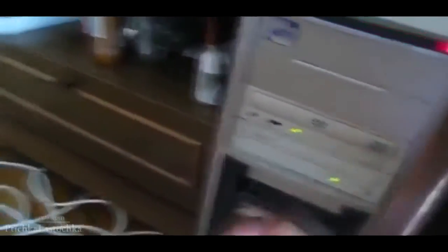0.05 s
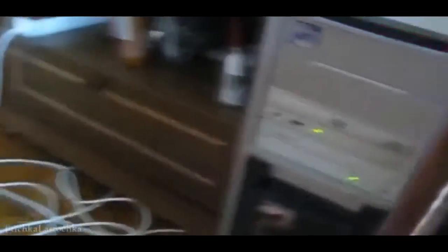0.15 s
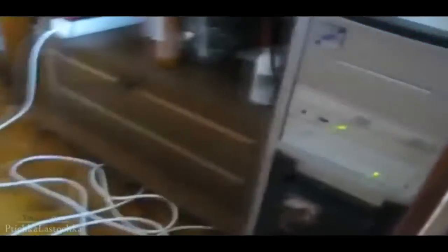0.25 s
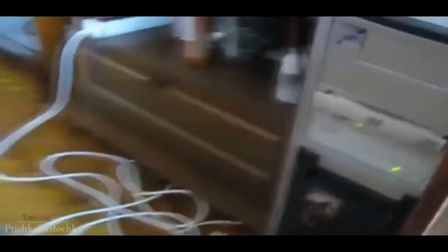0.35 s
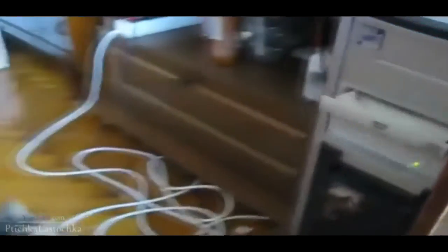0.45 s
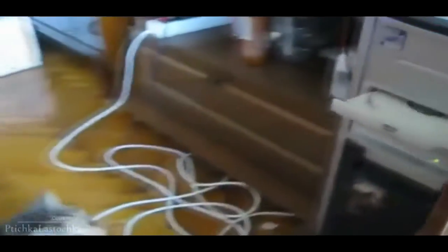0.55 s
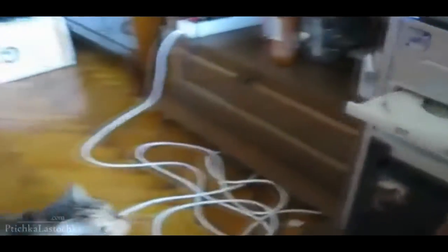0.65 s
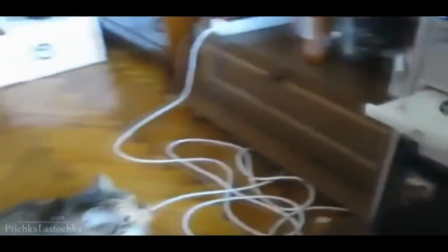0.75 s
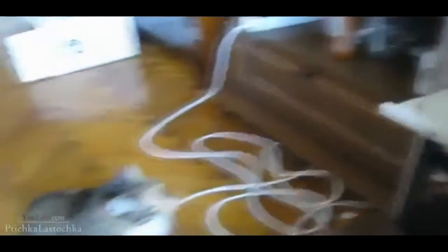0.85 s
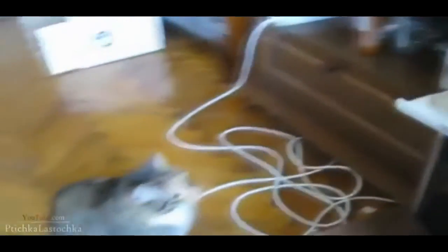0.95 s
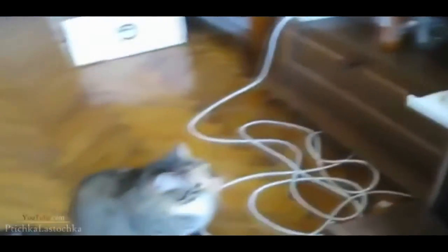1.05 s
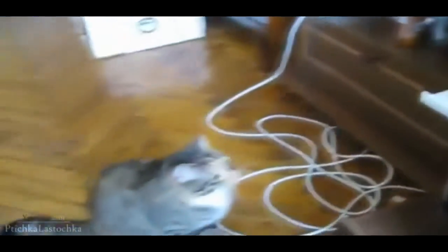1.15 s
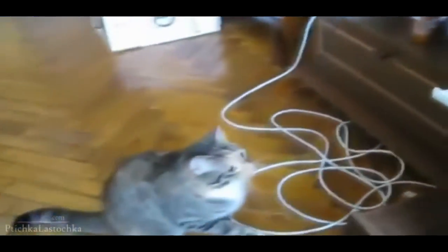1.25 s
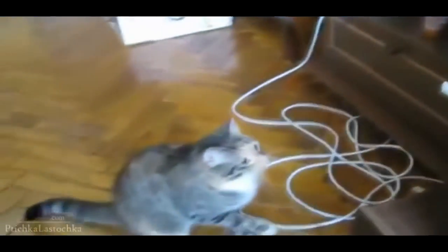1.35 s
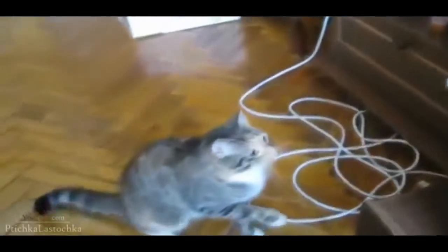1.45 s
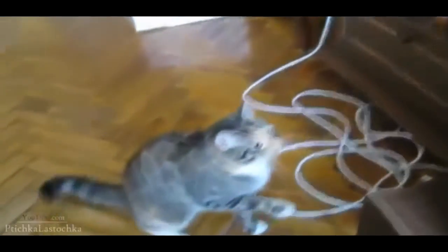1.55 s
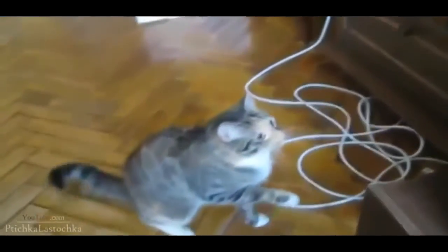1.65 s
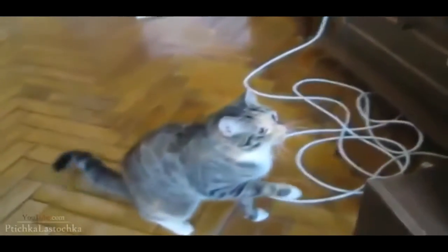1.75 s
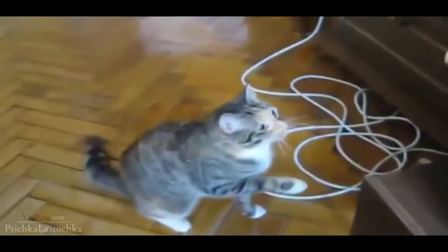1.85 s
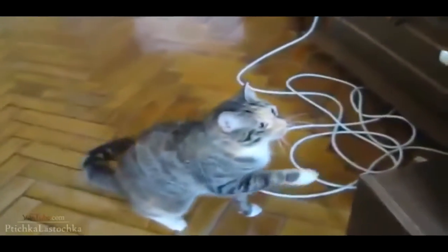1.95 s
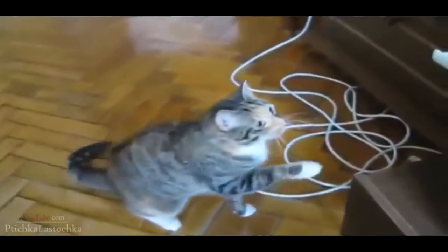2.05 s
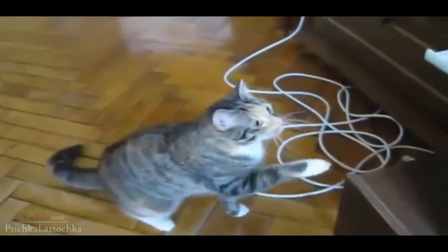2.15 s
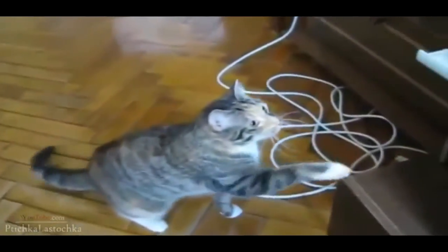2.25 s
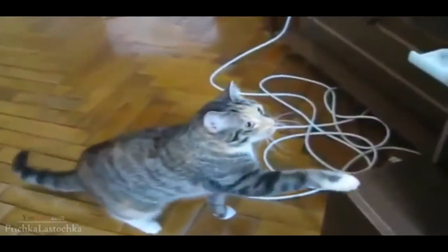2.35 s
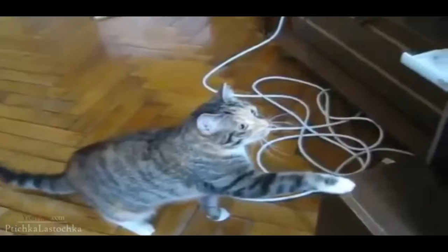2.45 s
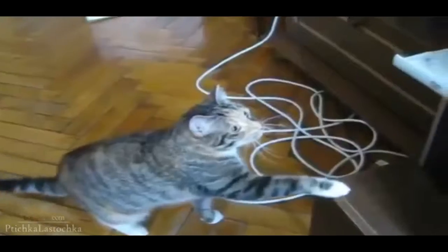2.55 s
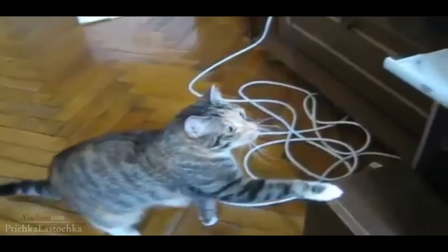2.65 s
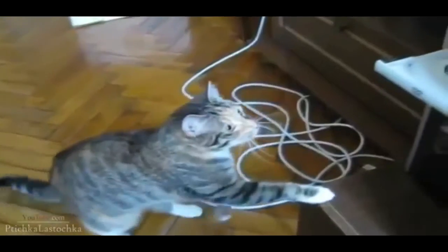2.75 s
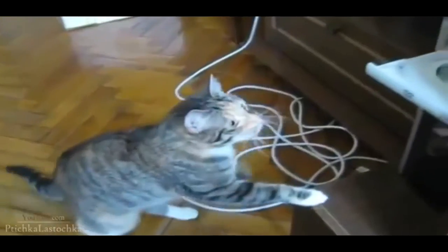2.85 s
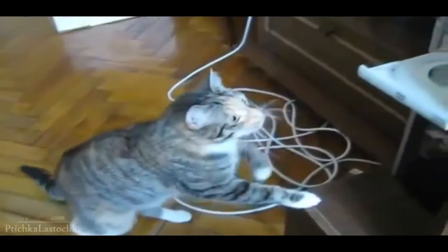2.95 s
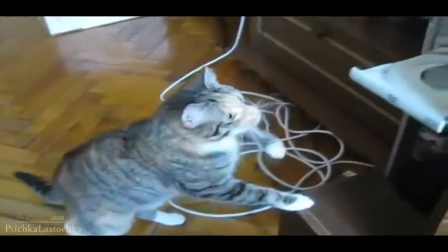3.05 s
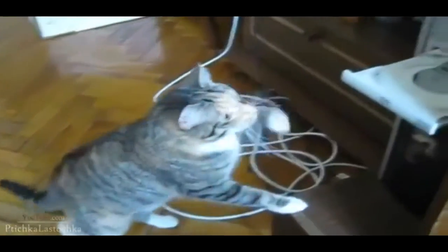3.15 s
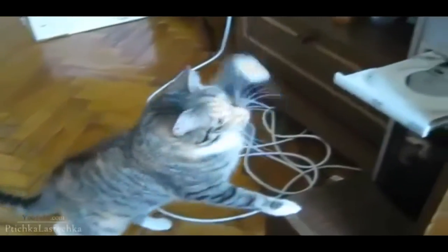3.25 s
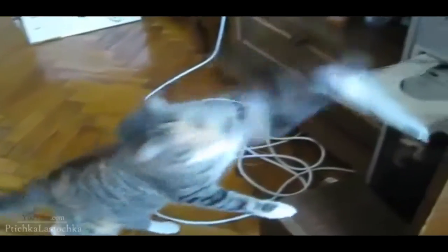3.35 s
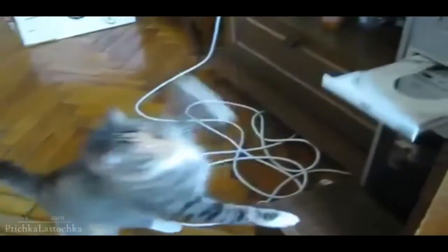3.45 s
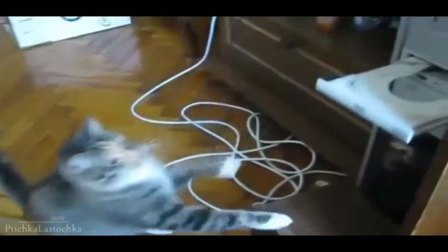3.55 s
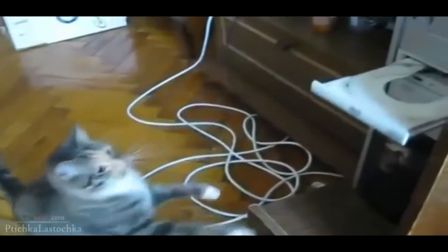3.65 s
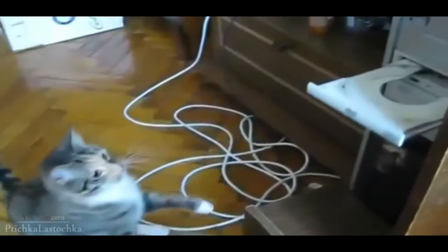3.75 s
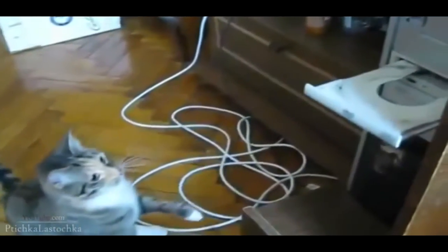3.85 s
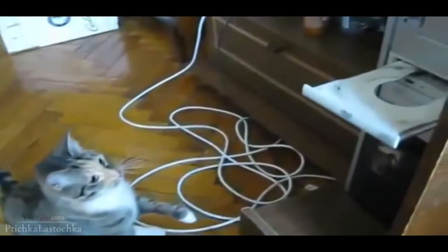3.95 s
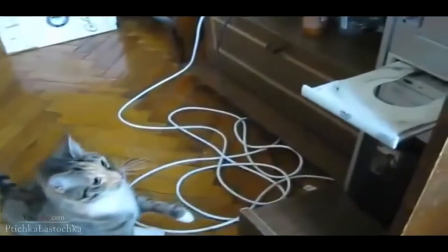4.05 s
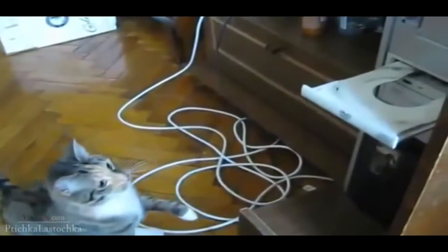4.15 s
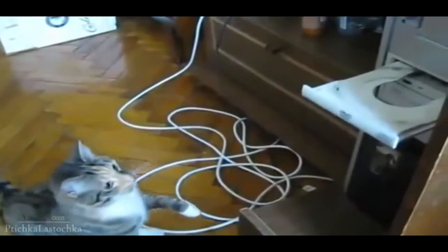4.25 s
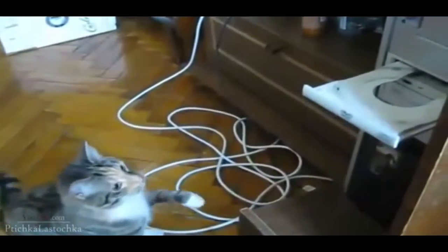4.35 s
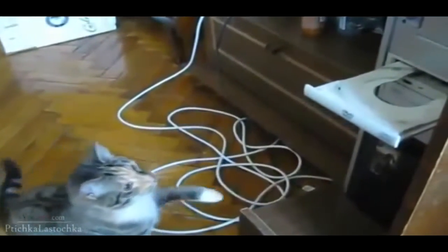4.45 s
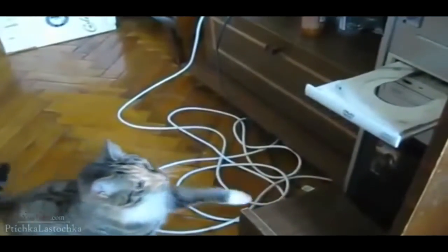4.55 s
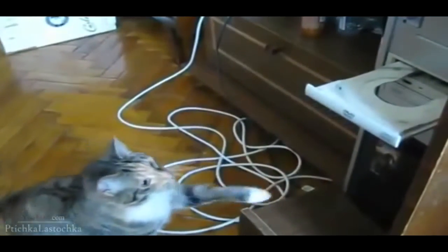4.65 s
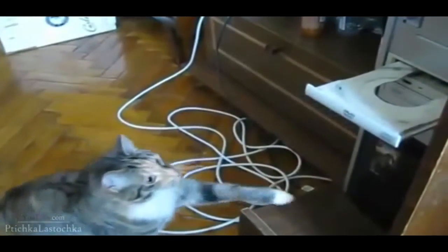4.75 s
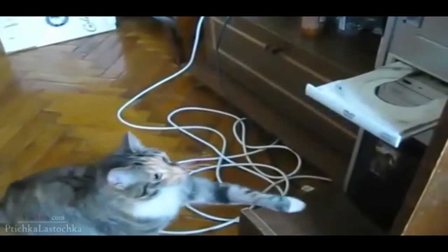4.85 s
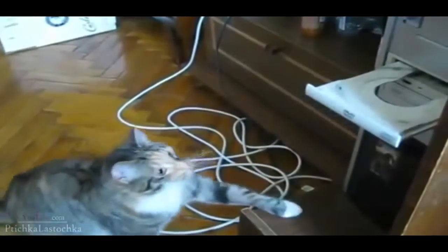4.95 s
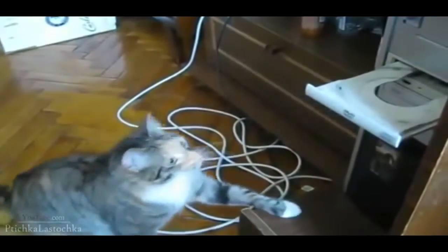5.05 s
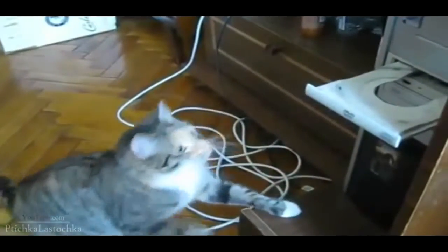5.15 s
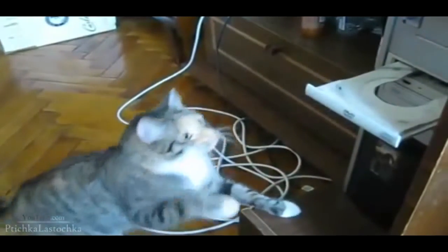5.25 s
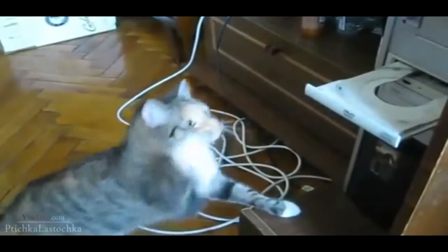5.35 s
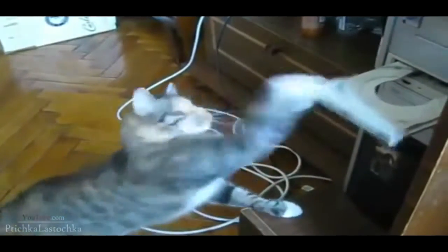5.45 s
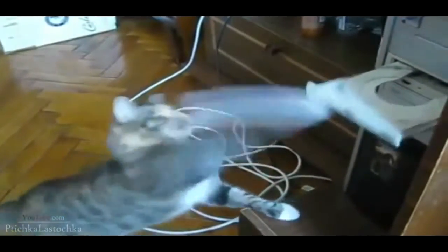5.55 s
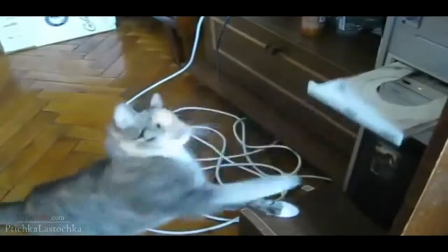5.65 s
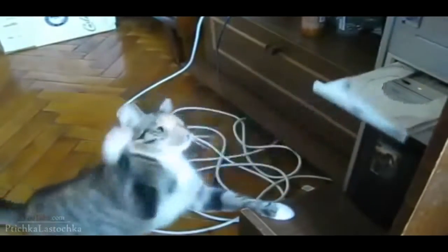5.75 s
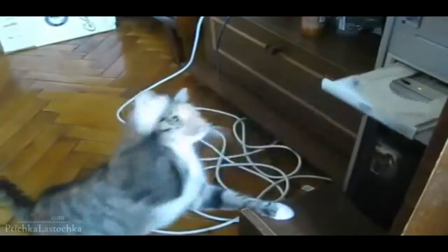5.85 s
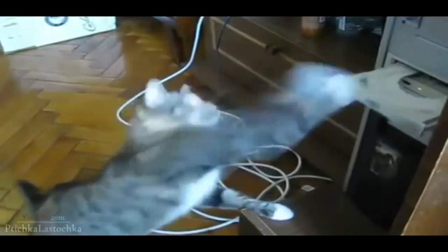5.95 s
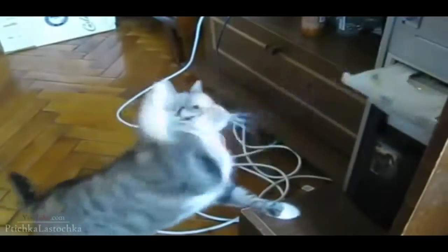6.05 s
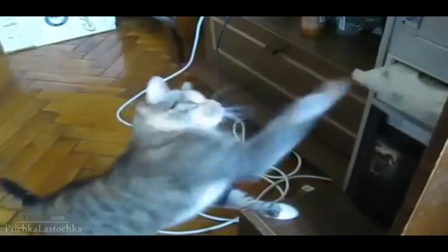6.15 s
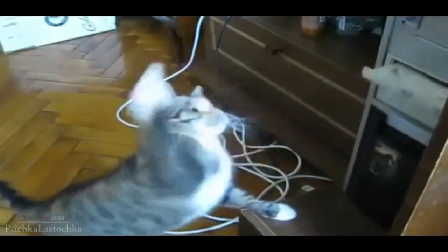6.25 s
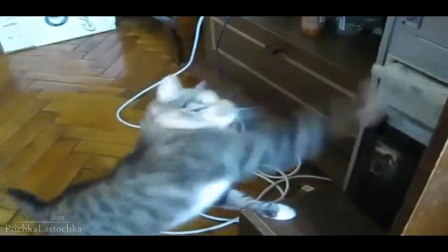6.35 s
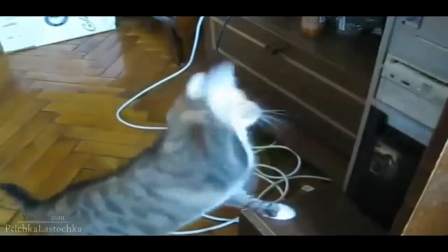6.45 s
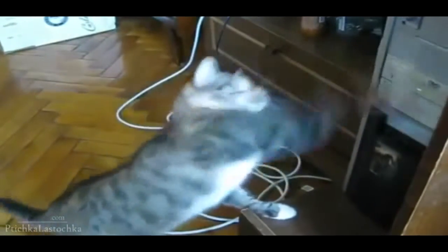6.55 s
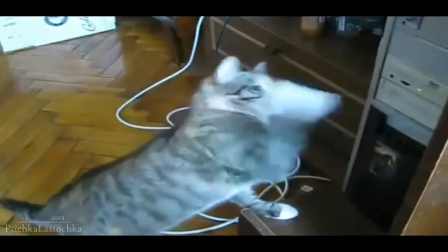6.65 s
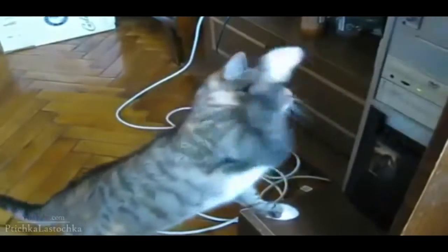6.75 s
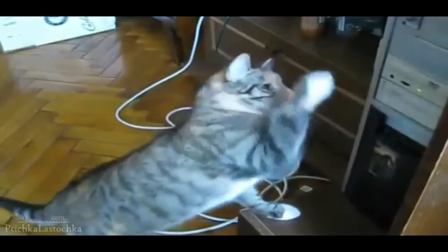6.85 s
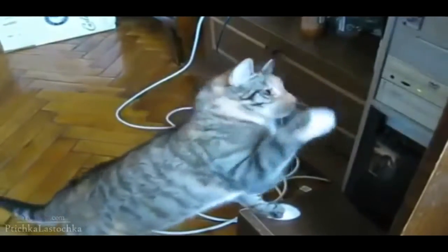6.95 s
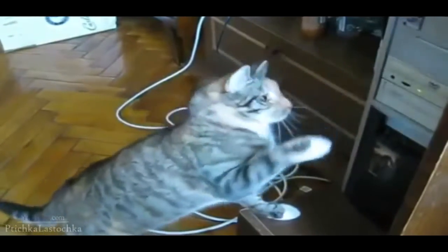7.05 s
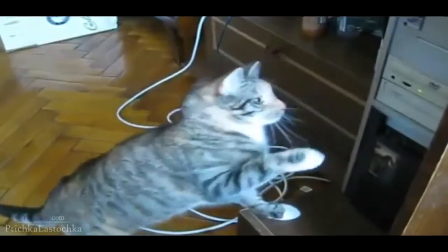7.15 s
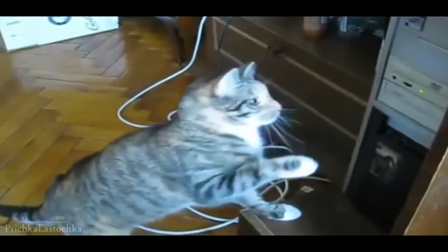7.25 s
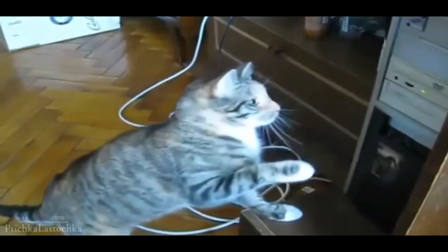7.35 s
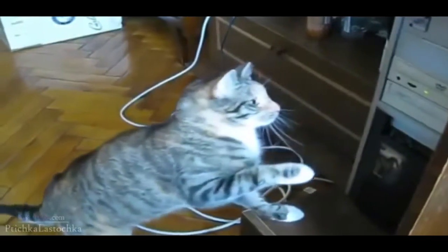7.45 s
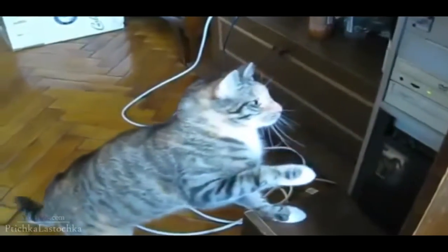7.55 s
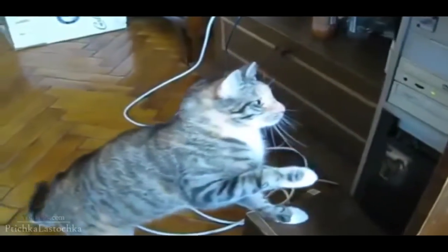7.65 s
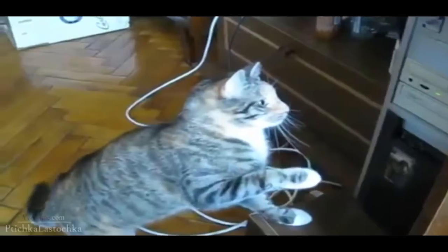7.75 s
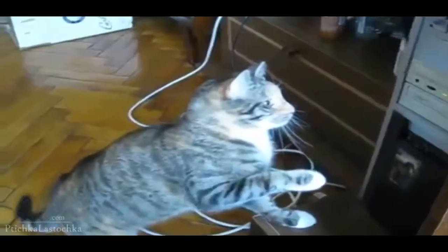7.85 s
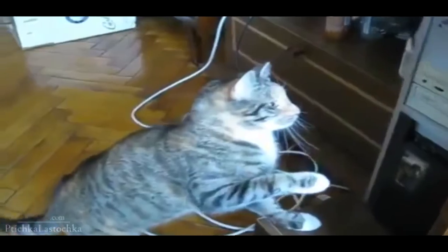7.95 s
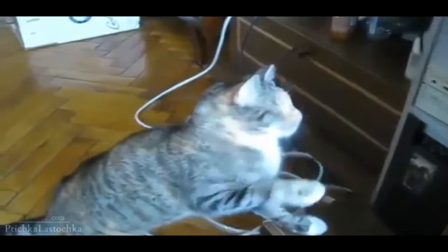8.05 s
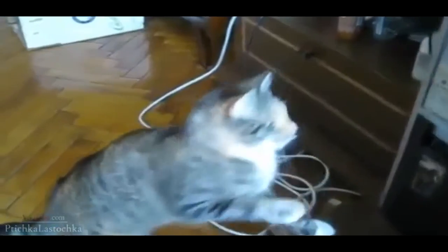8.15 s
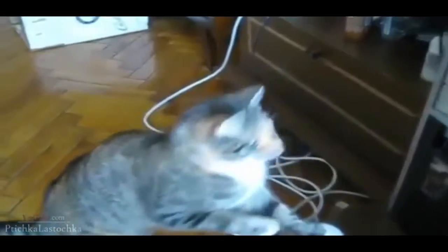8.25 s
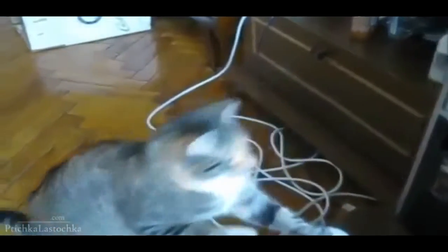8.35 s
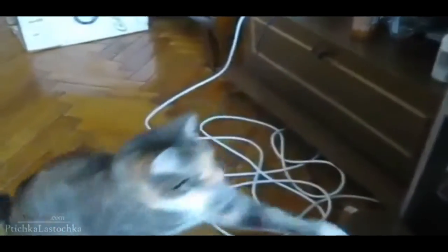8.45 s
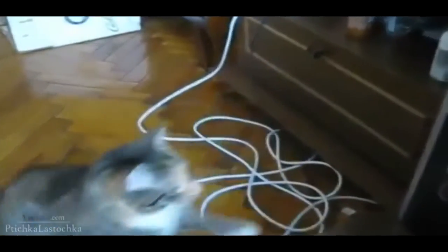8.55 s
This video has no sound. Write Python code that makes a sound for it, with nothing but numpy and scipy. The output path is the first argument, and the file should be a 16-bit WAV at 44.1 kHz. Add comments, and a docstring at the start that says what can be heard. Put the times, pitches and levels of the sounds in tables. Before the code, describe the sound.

In a small room with humming fans, a drive tray clicks and whines open, gets sharp rattling paw slaps, scrapes back in and latches.

```python
"""A small room with a humming computer: fan noise is a filtered random wash with wavering tones. The disc tray
unlatches and whirs out; each contact excites damped modes, and the drive is ticks and gliding sines. A cat
slaps the plastic tray, which rattles, then slides back in under more slaps and latches. A hand-held camera's
limiter ducks at each blow and lets the room's echo, dense random taps, swell up behind it; a dry pop in the
camera comes between the slaps."""
import sys
import numpy as np
from scipy import signal
from scipy.fft import rfft, irfft, next_fast_len
from scipy.io import wavfile

SR = 44100
rng = np.random.default_rng(int(sys.argv[2]) if len(sys.argv) > 2 else 0)


def wrap_up_sound(samples):
    """Save the sound to the file named by the first command line argument, as 16-bit audio."""
    columns = np.atleast_2d(samples).T
    # keep every value between -1 and 1, then stretch to whole-number steps
    tamed = np.clip(columns, -1, 1)
    steps = np.round(tamed * 32767).astype(np.int16)
    wavfile.write(sys.argv[1], SR, steps)


def field_ratio(decibels):
    """Amplitude ratio for a level in dB (20 dB per decade); scalars and array-likes work."""
    return 10 ** (np.asarray(decibels, dtype=float) / 20)


N = 380141  # length in samples


def evened(x):
    """Normalisation of power: scales to rms 1."""
    return x / np.sqrt(np.mean(x ** 2) + 1e-20)


def read(points, hz):
    """Logarithmic frequency scale: interpolates a curve between points on it."""
    f, value = np.transpose(points)
    return np.interp(np.log(hz + 1), np.log(f + 1), value)


def add(mix, s, sound):
    """Superposition: sums a sound into the mix from s seconds."""
    part = mix[round(s * SR):][:len(sound)]
    part += sound[:len(part)]


def coloured(x, db_of):
    """Zero-phase linear filtering: multiplies the spectrum by a gain in dB given as a function of Hz."""
    size = next_fast_len(len(x))
    gain = field_ratio(db_of(np.fft.rfftfreq(size, 1 / SR)))
    return irfft(rfft(x, size) * gain, size)[:len(x)]


def wander(count, hz):
    """One-pole low-passed noise: a slow random fluctuation of rms 1."""
    pole = np.exp(-2 * np.pi * hz / SR)
    return evened(signal.lfilter([1], [1, -pole], rng.standard_normal(count)))


def whistle(rows, waver_hz, flutter_db):
    """Frequency and amplitude modulation: a sine follows a pitch curve, unsteady in pitch and level."""
    s, pitch_hz, level_db = np.transpose(rows)
    t = np.arange(s[0], s[-1], 1 / SR)
    hz = np.interp(t, s, pitch_hz) + waver_hz * wander(len(t), 47)
    level = field_ratio(np.interp(t, s, level_db) + flutter_db * wander(len(t), 33))
    sine = np.sin(2 * np.pi * np.cumsum(hz) / SR)
    return s[0], np.sqrt(2) * level * sine * signal.windows.tukey(len(t), .05)


def fans():
    """Broadband flow noise filtered by the case's resonances, with a few wavering blade tones."""
    # relative spectrum of the air noise: pitch_hz, level_db
    air = [(15, -37), (25, -10.5), (71, -5), (104, -7), (156, -4.5), (782, -8), (1200, -11), (1380, -9.5),
           (2230, -8.5), (6380, -18.5), (7910, -30.5), (9810, -22.5), (15500, -36.5)]
    # case resonances: pitch_hz, width_hz, boost_db
    resonances = [(810, 190, 4.9), (840, 20, 1.9), (1200, 275, 8.7), (1696, 133, 7.9), (2238, 71, 8.7),
                  (4520, 59, 5)]
    # blade tones before the slow level changes: pitch_hz, level_db
    blade_tones = [(931.3, -66), (1222, -68.5), (2283, -75.5)]
    # slow level changes of the wash and of the tones: time_s, wash_gain_db, tone_gain_db
    levels = [(0, 3.5, -4), (.05, 1, -4), (.45, 1, -13), (1.4, -2.5, 7.5), (5.5, -2.5, 6), (7.2, -2, 2),
              (8.62, -1, -1)]
    s, wash_db, tone_db = np.transpose(levels)
    t = np.arange(N) / SR

    def case_db(hz):
        peaks = sum(db / (1 + (2 * (hz - f) / width) ** 2) for f, width, db in resonances)
        return read(air, hz) + peaks

    wash = evened(coloured(rng.standard_normal(N), case_db))
    out = wash * field_ratio(-44.5 + np.interp(t, s, wash_db) + .4 * wander(N, 2))
    for hz, db in blade_tones:
        tone = whistle([(0, hz, db), (N / SR, hz, db)], waver_hz=4.6, flutter_db=3.9)[1]
        add(out, 0, tone * field_ratio(np.interp(t, s, tone_db)))
    return out


def slide(rows, treble_db):
    """Friction noise of gear teeth and rails: dense uneven ticks, coloured by the drive."""
    # relative spectrum of the scrape: pitch_hz, level_db
    rails = [(100, -15.5), (300, -11.5), (700, -4), (1500, -2), (3000, -3), (5500, -6.5), (7500, -17),
             (11000, -24.5), (15000, -33)]
    treble_from_hz = 6800
    s, scrape_db = np.transpose(rows)
    t = np.arange(s[0], s[-1], 1 / SR)
    unevenness_db = 1.8 * wander(len(t), 150) + 1.5 * wander(len(t), 25)
    ticks = rng.standard_normal(len(t)) * field_ratio(unevenness_db)

    def drive_db(hz):
        shelf = 1 - 1 / (1 + (hz / treble_from_hz) ** 4)
        return read(rails, hz) + treble_db * shelf

    return s[0], evened(coloured(ticks, drive_db)) * field_ratio(np.interp(t, s, scrape_db))


def motor():
    """Friction and gear-mesh tones: two tray runs, gear whines and a faint thin whistle."""
    # the tray runs out, then in, one list a run: time_s, scrape_db
    runs = [
        [(.44, -65), (.47, -43.5), (.6, -32.5), (.9, -43.5), (1.31, -42.5), (1.35, -50), (1.55, -57.5)],
        [(5.84, -47), (5.9, -27), (6.1, -35), (6.4, -27), (6.6, -33.5), (6.85, -35)],
    ]
    # treble shelf of each run, brighter going out than coming in: gain_db
    run_treble = (4, -3.5)
    # gear whines, the first sagging as the motor takes the load: time_s, pitch_hz, level_db
    whines = [
        [(.62, 5350, -55), (.695, 5300, -43), (.725, 4250, -45), (.78, 3350, -47), (.86, 3030, -49),
         (1.12, 2990, -51), (1.2, 2830, -52), (1.32, 2680, -53)],
        [(.95, 3500, -60), (1.02, 3700, -53), (1.3, 3500, -58)],
        [(1.0, 5000, -66), (1.22, 5600, -55), (1.31, 5650, -60)],
    ]
    # faint thin whistle: time_s, pitch_hz, level_db
    thin_whistle = [(1.97, 14700, -80), (2.05, 13100, -73), (2.125, 13350, -74), (2.14, 13100, -84)]
    out = np.zeros(N)
    for rows, treble_db in zip(runs, run_treble):
        add(out, *slide(rows, treble_db))
    for rows in whines:
        add(out, *whistle(rows, waver_hz=60, flutter_db=3.5))
    add(out, *whistle(thin_whistle, waver_hz=15, flutter_db=1.5))
    return out


def knock(db, hz, octaves, contact_ms):
    """Modal excitation: a burst of small contacts cracks and rings the damped tray near hz.
    Returns the sound sent to the camera and the one sent to the walls, which averages all
    directions and so has a smooth spectrum."""
    # modes of the plastic tray and its frame, each blow varying them: pitch_hz, level_db, t60_s
    tray = [(260, -32, 0.15), (540, -11, 0.016), (1190, -2, .015), (1666, -12.5, 0.036), (2200, -9, 0.021),
            (3186, -23, 0.015), (4100, -4, 0.0086), (4500, -9.5, 0.0093), (4970, -5, 0.014),
            (6030, -9, 0.014), (10300, -8, 0.018)]
    # the whole case answers each knock: pitch_hz, level_db
    thud = [(60, -38), (130, -14), (200, -14), (258, -8.5), (330, -20.5), (577, -3.5), (750, -12),
            (1050, -9), (1400, -7), (3000, -8), (8000, -23)]
    f, mode_db, t60 = np.transpose(tray)[:, :, None]
    t = np.arange(2048) / SR
    spot = rng.standard_normal((len(tray), 2))  # where the blow lands

    def reach_db(x):
        struck_db = -6 * (np.log2((x + 20) / hz) / octaves) ** 2
        return 20 * np.log10(field_ratio(struck_db) + field_ratio(read(thud, x)))

    decay = field_ratio(mode_db + 0.84 * spot[:, :1] - 60 * t / t60)
    ring = (decay * np.sin(2 * np.pi * f * (1 + 0.059 * spot[:, 1:]) * t)).sum(0)
    u = t * 1000 / max(contact_ms, .05)
    contacts = rng.standard_normal(len(t)) * u * np.exp(-u * 2)
    # the loose tray chatters on
    chatter = rng.standard_normal(len(t)) * np.exp(-t / 0.0069) * (1 - np.exp(-u))
    contacts += field_ratio(-11.5) * chatter
    crack = evened(contacts) + field_ratio(-7) * evened(signal.fftconvolve(contacts, ring)[:len(t)])
    # 64 samples of lead leave room for the zero-phase filter's early half
    near = coloured(np.roll(crack, 64), reach_db)[64:]
    around = coloured(1. * (np.arange(len(t)) == 64), reach_db)
    return field_ratio(db) * near / np.linalg.norm(near), field_ratio(db) * around / np.linalg.norm(around)


def latch():
    """Snap-through impacts: latch and lifter parts snap over as the tray leaves."""
    # start_s, blow_db, most_excited_hz, contact_ms
    snaps = [(0.451, -15.5, 3530, 4), (0.467, -13, 1200, 4.6), (0.496, -3.5, 900, 3.3),
             (0.506, -1.5, 1470, 4.6), (0.516, -2, 4880, 3.1), (0.561, 4.5, 2200, 2.3),
             (.573, 1, 2410, 8.6), (0.614, -3, 1900, 5.7), (0.624, -13, 1870, 1.3), (.69, -5, 2800, 8.2),
             (.71, -6, 2760, 10), (.767, -10, 1990, 4), (1.299, -14.5, 3000, 9.4)]
    return [(s, db, hz, 0.57, ms) for s, db, hz, ms in snaps]  # 0.57: spread in octaves


def bumps():
    """Impacts of differing bandwidth: single sounds of their own colour."""
    # low thump, ping, thump, the shutting tray's knock and clunk, two soft brushes:
    # start_s, blow_db, most_excited_hz, spread_octaves, contact_ms
    single = [(.5, -1.5, 267, 0.35, 57), (.518, -2, 10220, 0.14, 4.4), (3.622, 6, 90, 0.49, 7.3),
              (6.793, 5.5, 740, 0.63, 2), (6.816, 25, 1970, 1.3, 2.9), (7.788, -14, 1900, 0.32, 24),
              (8.548, -10.5, 1650, 0.37, 27)]
    return single


def slaps():
    """Wide-band impact excitation: the paw strikes the tray."""
    # start_s, blow_db, most_excited_hz, contact_ms
    paw = [(3.621, 32, 4400, 3.8), (5.707, 27.5, 3900, 3.6), (5.842, 30.5, 4300, 1.4),
           (6.23, 27.5, 3600, 2.5), (6.394, 30.5, 4060, 3.1), (6.61, 29, 3630, 3.5)]
    return [(s, db, hz, 0.81, ms) for s, db, hz, ms in paw]  # 0.81: spread in octaves


def rattle(count):
    """Repeated impacts: the loose tray taps its frame; count uneven taps die away after the first slap."""
    # one row a tap: start_s, blow_db, contact_ms
    frame_taps = [(3.67, 2, 4.5), (3.716, 7.5, 9.4), (3.769, 7, 5), (3.824, 1.5, 7), (5.732, 22, 2),
                  (5.757, 13, 1.4), (5.78, 4.5, 3), (5.822, 9, 8), (5.937, 4.5, 5), (5.979, 8.5, 4.7),
                  (6.023, 6, 4.6), (6.108, -1.5, 2.7), (6.134, -7, 3.2), (6.168, -1, 3), (6.183, -3, 4.6),
                  (6.25, 18, 9.6), (6.41, 19.5, 9.8), (6.516, -1, 13), (6.635, 14.5, 3), (6.838, 15.5, 6.5)]
    tap = np.arange(count)
    gap_s, jitter_s = .046, .004
    dying_s = 3.885 + gap_s * tap + jitter_s * rng.standard_normal(count)
    first_db, db_per_tap, dying_ms = -10, -3, 5.3
    taps = frame_taps + [(s, first_db + db_per_tap * k, dying_ms) for k, s in enumerate(dying_s)]
    excited_hz, spread_octaves = 3900, 0.78
    return [(s, db, excited_hz, spread_octaves, ms) for s, db, ms in taps]


def room(x):
    """Diffuse reverberation: dense echoes of random sign, each band dying at its own speed."""
    # reverberation time: pitch_hz, t60_s
    decay_times = [(150, 1), (500, 1), (1500, 0.6), (4000, 0.43), (8000, 0.28), (14000, 0.27)]
    taps = np.zeros(SR)
    at = np.arange(300, SR - 8, 8)
    taps[at + rng.integers(0, 8, len(at))] = rng.choice([-1., 1.], len(at))
    hz, t, z = signal.stft(taps, SR, nperseg=256)
    decay = field_ratio(-60 * t / read(decay_times, hz)[:, None])
    tail = signal.istft(z * decay, SR, nperseg=256)[1]
    return signal.fftconvolve(x, tail / np.linalg.norm(tail))[:N]


def scene():
    """Direct and reverberant fields summed: tray and motor sound in the room, over the fans."""
    near, around = np.zeros((2, N))
    for s, *blow in latch() + bumps() + slaps() + rattle(count=5):
        direct, spread = knock(*blow)
        add(near, s, direct)
        add(around, s, spread)
    drive = motor()
    echo = field_ratio(-11) * room(around + drive)
    return (near + drive + echo + fans())[None]


def limiter(x, knee_db, share, window_ms, recovery_db_per_s):
    """Automatic gain control: ducks within a few ms when loud, recovers steadily; peaks clip softly."""
    smooth = np.exp(-1000 / (window_ms * SR))
    power_db = 10 * np.log10(signal.lfilter([1 - smooth], [1, -smooth], x ** 2) + 1e-12)
    # the running maximum on a tilted scale lets each peak fall at a fixed rate
    fall = np.arange(N) * recovery_db_per_s / SR
    held_db = np.maximum.accumulate(power_db + fall) - fall
    over_db = np.maximum(held_db - knee_db, 0)
    return .93 * np.tanh(x * field_ratio(-share * over_db) / .93)


def pop(db, fall_ms, rebound_ms):
    """Zero-mean impulse: a one-sided spike whose slow rebound cancels its area."""
    ms = np.arange(-20, 600) * 1000 / SR
    rise = 1 / (1 + np.exp(-ms / 0.027))
    after = np.maximum(ms, 0)
    rebound = fall_ms / rebound_ms ** 2 * after * np.exp(-after / rebound_ms)
    return field_ratio(db) * (rise * np.exp(-after / fall_ms) - rebound)


def shaped(x):
    """Spectrum shaping: a narrow notch near 8 kHz and a soft upper band edge."""
    # narrow notch: pitch_hz, width_hz, gain_db
    dip = (7920, 300, -15)
    # top of the band: pitch_hz, width_hz, gain_above_db
    edge = (15250, 120, -22)
    (f, width_hz, dip_db), (top, soft_hz, top_db) = dip, edge

    def shape_db(hz):
        notch = dip_db * np.exp(-((hz - f) / width_hz) ** 2)
        return notch + top_db * (1 + np.tanh((hz - top) / soft_hz)) / 2

    return coloured(x, shape_db)


def roll_off(x):
    """The treble ends steeply here."""
    return signal.sosfilt(signal.butter(12, 16470, fs=SR, output="sos"), x)


def record(dry):
    """A chain of systems: limiter, then the pop, then a notch and band edge."""
    x = limiter(dry[0], knee_db=-15, share=.95, window_ms=4, recovery_db_per_s=200)
    # dry pop in the camera: height_db, fall_ms, rebound_ms
    spike = (-1, 0.25, 0.91)
    add(x, 5.4591 - 20 / SR, pop(*spike))  # its rise begins 20 samples ahead
    return roll_off(shaped(x)[None])


dry = scene()
out = record(dry)
wrap_up_sound(out)
```